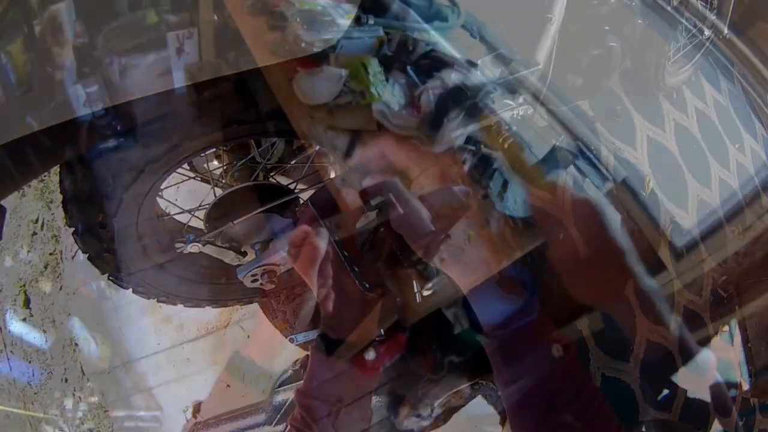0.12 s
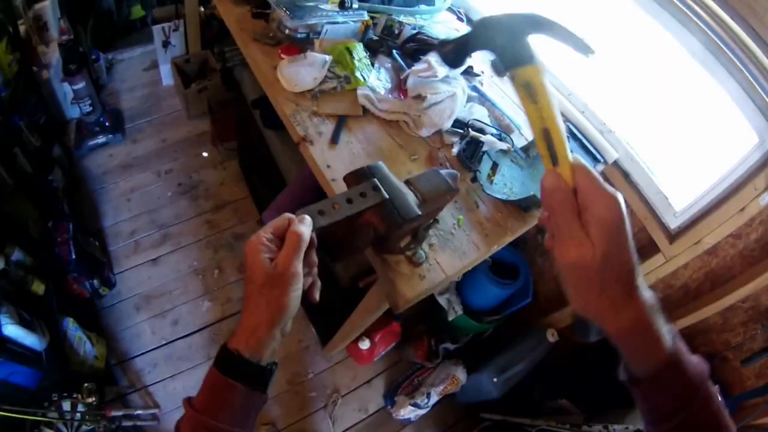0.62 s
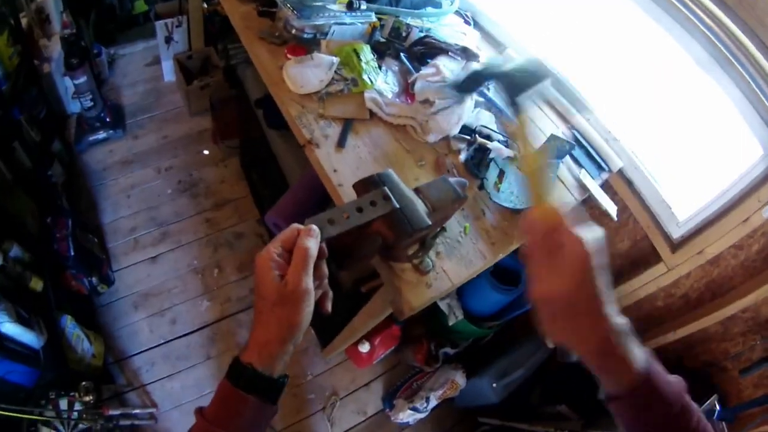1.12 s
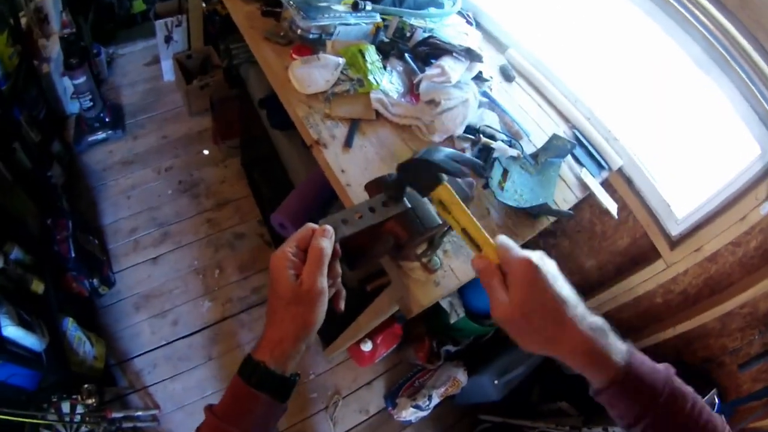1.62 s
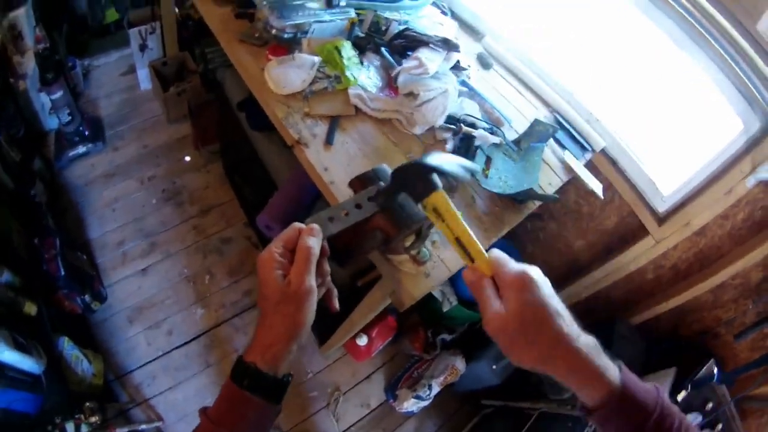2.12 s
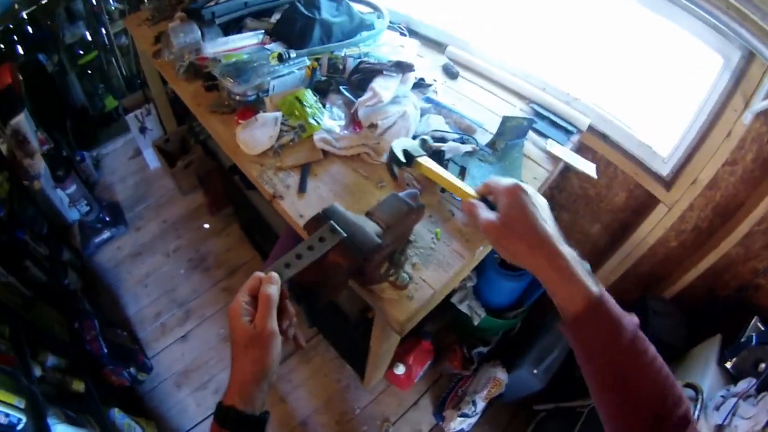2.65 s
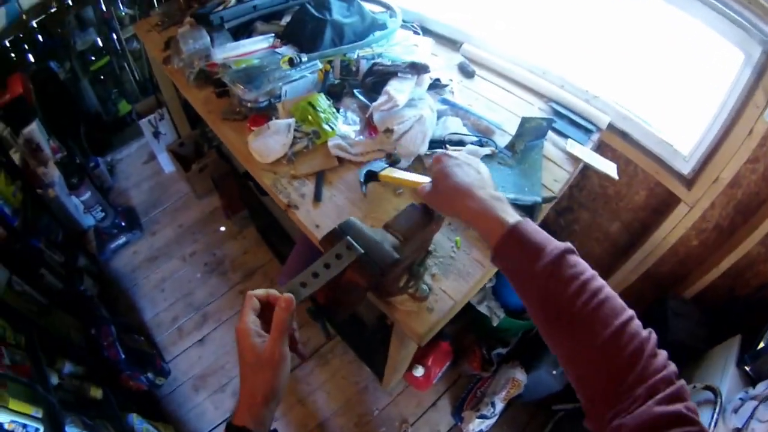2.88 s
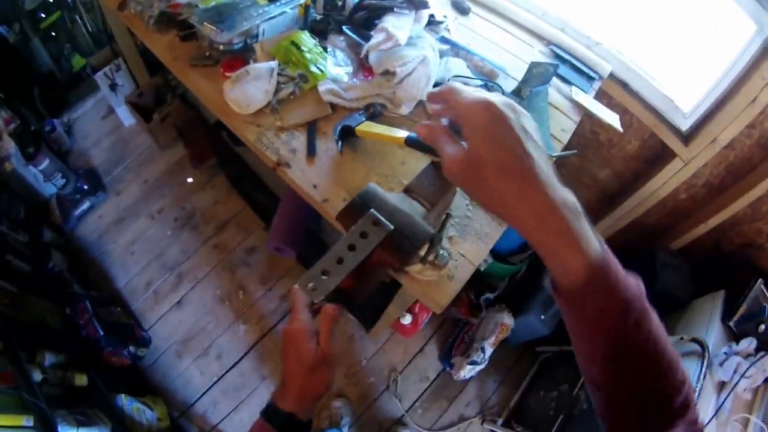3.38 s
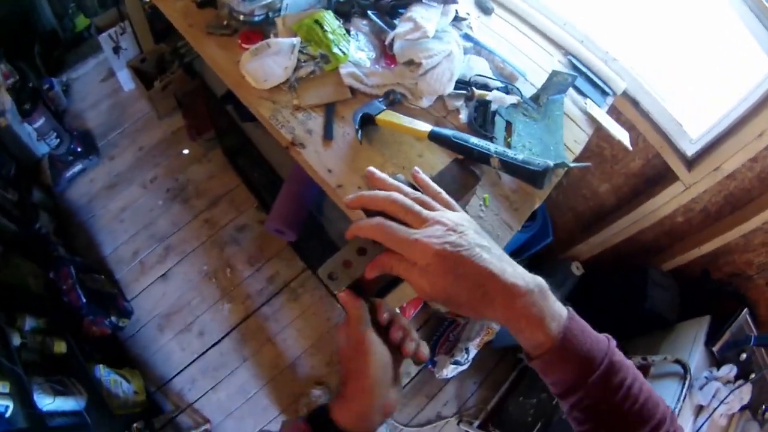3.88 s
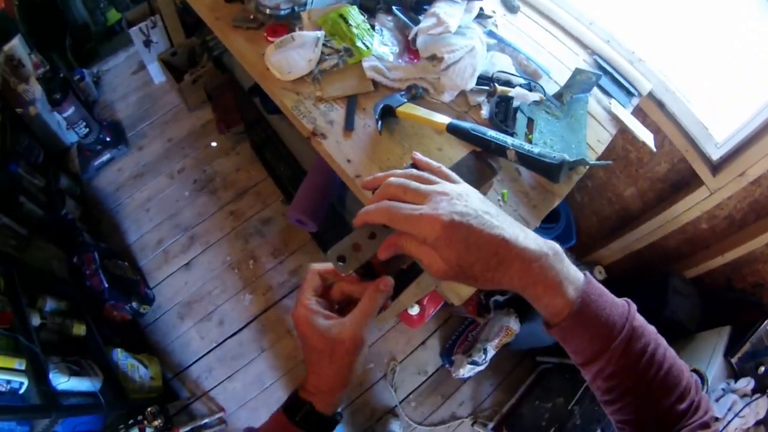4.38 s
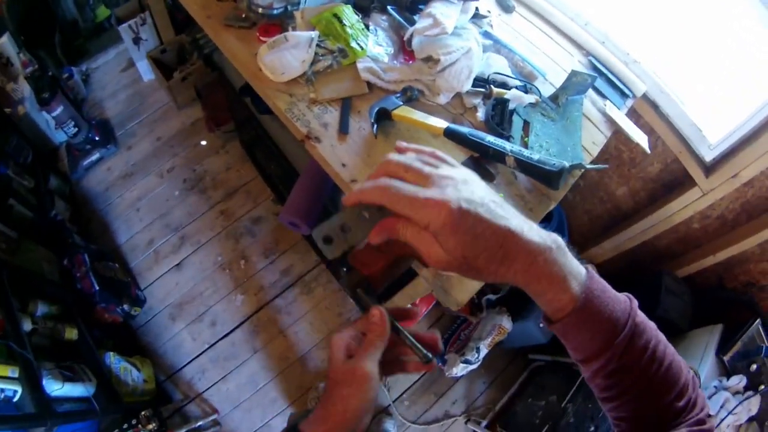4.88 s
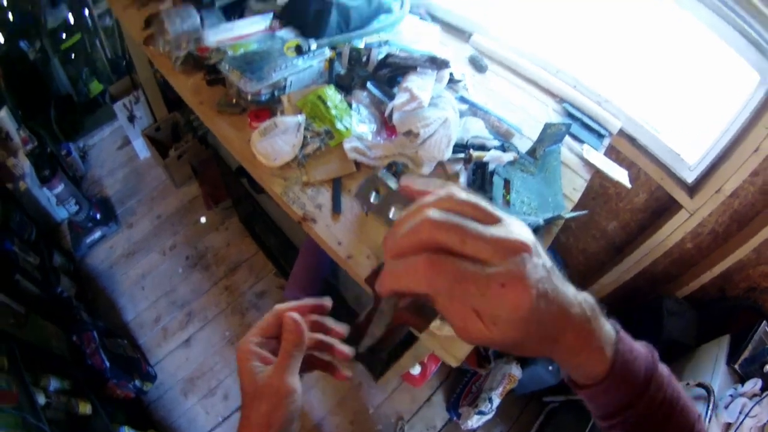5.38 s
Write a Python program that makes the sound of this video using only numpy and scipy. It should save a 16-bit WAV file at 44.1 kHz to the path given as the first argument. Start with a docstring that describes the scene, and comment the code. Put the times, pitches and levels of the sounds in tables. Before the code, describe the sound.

Six hard hammer blows clang on a clamped steel strap in a wooden workshop, then dull bench thuds and small metallic knocks and scrapes.

```python
"""A hammer blow on a steel strap opens the scene, out of a floor that is already trembling.
Place: a wooden workshop, the perforated strap held in a vice. Six blows ring strap and vice, rattle the clutter
and shudder bench and floor; then the hammer is laid down on the bench with dull thuds and a hand shifts the
strap in the jaws. Contacts are noise bursts that stir ringing modes; slides, rumble and air are coloured noise.
A small recorder overloads, pulls its gain down late and mirrors its band; an editing fade brings the sound up."""
import sys
import numpy as np
from scipy import signal
from scipy.fft import rfft, irfft, next_fast_len
from scipy.io import wavfile

SR = 44100
rng = np.random.default_rng(int(sys.argv[2]) if len(sys.argv) > 2 else 0)


def generate_wav(signal):
    """Clip the signal to [-1, 1] and save it as 16-bit WAV at the path in sys.argv[1]."""
    frames = np.transpose(np.atleast_2d(signal))
    scaled = np.clip(frames, -1, 1) * 32767
    pcm = np.round(scaled).astype(np.int16)
    wavfile.write(sys.argv[1], SR, pcm)


def gain_from_db(level_db):
    """Convert decibel levels to linear amplitude factors (20 dB per decade)."""
    decades = np.asarray(level_db, float) / 20
    return 10 ** decades


N = 243431
TIME = np.arange(N) / SR
EDGES = 20 * 2 ** np.arange(0, 8.4, 1 / 3)   # third-octave band edges, f/Hz
CENTRES = np.sqrt(EDGES[1:] * EDGES[:-1])

# Contacts, three tables alike: [t/s, level/dB before the group's gain, lows re level/dB,
# drive of the modes re level/dB, favoured f/Hz]
# hammer blows on the strap
HAMMER_BLOWS = [(0.021, 8, -3.5, -5, 1360), (0.452, 4, -5.5, -9, 1200), (0.872, 4.5, -5.5, -6, 1186),
                (1.304, 3.5, -5, -8, 1140), (1.714, 2, -4, -10, 1110), (2.157, 1, -6.5, -3.5, 1611)]
# strap knocking on the jaws, clutter settling
STRAP_KNOCKS = [(0.352, -37, 1, -19, 890), (1.962, -30.5, -3, -15, 884), (2.226, -60, -6, -20, 2340),
                (3.365, -32, -7, -5.5, 1413), (3.442, -41, -19, 5, 1390), (3.643, -25.5, -0.5, -1, 3300),
                (3.685, -45, 11, -15.5, 2460), (3.866, -47, 12, 1.5, 1410), (4.018, -49.5, 19, -3, 970),
                (4.111, -39.5, 4, 10.5, 5700), (4.164, -7.5, -12, -5.5, 1980), (4.266, -26.5, 5.5, -9, 910),
                (4.436, -41.5, 13.5, -6, 5700), (4.519, -11.5, 3, 6.5, 5870), (4.895, -34, -9.5, -30, 4860),
                (4.968, -21.5, -21, 1.5, 3840), (5.001, -19, -10.5, 0, 4100), (5.018, -33.5, 5, -15, 1400),
                (5.154, -51, 19, 1, 1350), (5.212, -21.5, -24.5, -12.5, 2270), (5.222, -32, -21, 6, 4550),
                (5.238, -33, 1, 4.5, 2310), (5.363, -10.5, 0, -2.5, 1620)]
# dull thuds of the hammer laid down on the bench top
BENCH_THUDS = [(2.952, -36, -12, -11.5, 300), (3.2415, -13.5, -5, 1, 520)]

# Modes, three tables alike: [f/Hz, level/dB, t60/s before any cap by the grip]
# strap and vice, clamped together
CLAMPED_MODES = [(315, -15, 0.11), (513, -16, 0.032), (820, -16, 0.13), (1187, 3.5, 0.022),
                 (1106, -13, 0.014), (1306, -8, 0.08), (1440, -14, 0.016), (1700, -8.5, 0.17),
                 (2205, -20, 0.12), (2598, -5.5, 0.13), (3300, -13, 0.018), (4140, -17, 0.018),
                 (5045, 1, 0.094)]
# strap free in the jaws
LOOSE_MODES = [(890, -9, .05), (1390, -6, .05), (1900, -6, .06), (2340, -4, .055), (2790, -5, .07),
               (2990, -6, .06), (3400, -5, .055), (3950, -4, .045), (4250, -3, .05), (4600, -5, .055),
               (5010, -6, .055), (5518, -7, .17)]
# wooden bench
BENCH_MODES = [(221, -2, .14), (310, -4, .12), (409, 0, .11), (490, -5, .1), (581, -1, .12), (646, -4, .12),
               (760, -8, .09), (894, -10, .1), (1583, -18, .07)]

# wash off the plank walls: [f/Hz, level re clatter/dB, t60/s]
WALL_WASH = [(300, -11, 0.51), (1170, -17.5, 0.26), (5070, -21, 0.39)]
# spectrum of the bench and floor rumble: [f/Hz, level per Hz/dB]
SHUDDER_SPECTRUM = [(13, -30), (22, 4), (38, -2), (75, -3), (103, -15.5), (187, -12), (225, -16),
                    (432, -21), (625, -38.5), (844, -32.5), (1200, -37), (1560, -72.5), (2640, -120)]
# notes at which the floor booms: [f/Hz, width/Hz, level/dB]
FLOOR_NOTES = [(29.7, 14, -12.5), (75.2, 25, -9.5)]
# contacts that shake the bench: [t/s, deep shudder level/dB, time until the deep shudder's fast fall/s]
BENCH_JOLTS = [(-0.2, -22, 0.6), (0.02, -31, 0.66), (0.452, -24.5, 0.53), (0.872, -28.5, .38),
               (1.304, -25, .36), (1.714, -25.5, 0.32), (2.157, -26.5, 0.37), (2.951, -51, 0.054),
               (3.2426, -31.5, 0.21), (3.643, -42.5, .06), (4.164, -40.5, 0.11), (4.519, -32.5, 0.083),
               (5.363, -36.5, 0.056)]
# spectrum of the room air: [f/Hz, level per Hz/dB]
AIR_SPECTRUM = [(59, -31.5), (100, -9), (240, -8.5), (440, -8.5), (1290, -13), (4890, -23.5), (5600, -44.5),
                (7280, -64.5), (12300, -120)]
# steel sliding against steel: [t/s, length/s, level/dB before colouring, favoured f/Hz]
STEEL_SLIDES = [(0.756, 0.01, -46, 2470), (1.952, 0.6, -42, 1134), (2.744, 0.12, -65, 1603),
                (3.271, 0.053, -48, 2900), (3.382, 0.054, -52.5, 2340), (3.634, 0.06, -48, 2930),
                (3.864, 0.094, -55.5, 1400), (4.002, 0.032, -54, 1376), (4.228, 0.078, -46.5, 2260),
                (4.448, 0.083, -59, 5640), (4.508, 0.073, -31, 3170), (4.899, 0.07, -54, 4800),
                (4.998, 0.073, -45, 3900), (5.137, 0.05, -47, 1390), (5.196, 0.053, -51, 4220)]
# clutter rattling after every blow: [delay/s, length/s, level re the blow's table level/dB, favoured f/Hz]
CLUTTER_RATTLES = [(0.05, 0.074, -42.5, 2620), (0.043, 0.052, -43, 14000), (0.059, .06, -54.5, 17000),
                   (.12, 0.092, -56, 1390)]
# editing fade at the start: [t/s, level/dB]
FADE_POINTS = [(0, -11), (.45, -3), (.8, 0)]


def rms_one(x):
    """Scales a signal to rms 1."""
    return x / np.sqrt(np.mean(x ** 2, axis=-1, keepdims=True) + 1e-20)


def at_hz(points, hz):
    """Reads a curve of (f, value) along a logarithmic frequency axis."""
    points = np.array(points)
    return np.interp(np.log(hz), np.log(points[:, 0]), points[:, 1])


def butter(x, order, hz, kind="low"):
    """Butterworth filter."""
    return signal.sosfilt(signal.butter(order, hz, kind, fs=SR, output="sos"), x)


def drift(rate):
    """Slow chance of rms 1: random points, rate per second, joined by lines."""
    knots = rng.standard_normal(2000)
    return rms_one(np.interp(TIME * rate, np.arange(2000), knots))


def bands(grain_db):
    """Third-octave bands of noise, flat per Hz; samples of uneven size make it grainy."""
    unevenness = np.minimum(rng.exponential(1, (2, N)), 6)
    white = rms_one(rng.standard_normal((2, N)) * gain_from_db(grain_db * unevenness))
    # neighbouring bands draw on different noise
    return np.array([butter(white[k % 2], 2, edge, "band") for k, edge in enumerate(zip(EDGES, EDGES[1:]))])


def coloured(noise, spectrum, flicker_db, rate):
    """Noise whose bands each get a level and a flicker, partly shared; rms 1."""
    shared = drift(rate)
    total = np.zeros(N)
    for band, hz in zip(noise, CENTRES):
        total += band * gain_from_db(at_hz(spectrum, hz) + flicker_db * (shared + drift(rate)))
    return rms_one(total)


def shudder(noise):
    """Low rumble of bench and floor with resonances at the floor's own notes; rms 1."""
    out = coloured(noise, SHUDDER_SPECTRUM, flicker_db=0.83, rate=17)
    for hz, width_hz, db in FLOOR_NOTES:
        b, a = signal.iirpeak(hz, hz / width_hz, fs=SR)
        boom = signal.lfilter(b, a, signal.lfilter(b, a, rng.standard_normal(N)))
        out += gain_from_db(db) * rms_one(boom)
    return rms_one(out)


def shaking(rest_db, gain_db, swell_s, share, sag_db_per_s):
    """Gain of the shudder: a resting rumble plus, for every jolt, a swell that sags and then falls fast."""
    power = np.full(N, gain_from_db(2 * rest_db))
    for s, db, lasts_s in BENCH_JOLTS:
        t = np.maximum(TIME - s, 0)
        fall_db = 163.5 * np.maximum(t - share * lasts_s, 0)   # 163.5 dB per s
        swell = 1 - np.exp(-t / swell_s)
        power += (swell * gain_from_db(db + gain_db - sag_db_per_s * t - fall_db)) ** 2
    return np.sqrt(power)


def rumble(noise):
    """The deep part of the shudder outlasts the upper part, which swells more slowly and sags faster."""
    split_hz = 110
    whole = shudder(noise)
    deep = butter(whole, 2, split_hz)
    upper = butter(whole, 2, split_hz, "high")
    deep_gain = shaking(rest_db=-50, gain_db=0, swell_s=0.013, share=1, sag_db_per_s=10)
    upper_gain = shaking(rest_db=-49.5, gain_db=5.5, swell_s=0.068, share=.7, sag_db_per_s=41)
    return deep * deep_gain - upper * upper_gain


def room_air(noise):
    """Steady background air: coloured noise with a quick flicker."""
    return gain_from_db(-53.5) * coloured(noise, AIR_SPECTRUM, flicker_db=1.2, rate=24)


def ring(x, hz, t60):
    """Damped resonance: a unit click sets a sine of height 1 ringing."""
    r, w = gain_from_db(-60 / (t60 * SR)), 2 * np.pi * hz / SR
    return signal.lfilter([0, np.sin(w)], [1, -2 * r * np.cos(w), r * r], x + 1e-18)


def strike(events, modes, noise, t60, gain_db, body_hz, high_db, rise_s, crack_s, crack_db,
           db_per_octave, chatter_share, longest_s):
    """Each contact cracks, clatters (treble dies faster), washes off the walls and chatters on the modes."""
    out, drive, t = np.zeros(N), np.zeros((len(modes), N)), TIME[:SR // 2]
    walls, mode_hz = np.array(WALL_WASH), np.array(modes)[:, :1]
    wash_t60 = at_hz(walls[:, ::2], CENTRES)[:, None]
    wash = gain_from_db(at_hz(walls, CENTRES)[:, None] - 60 * t / wash_t60)
    wash *= np.minimum(t / 0.036, 1)   # the walls answer gradually
    clatter_t60 = t60 * (CENTRES / 2000) ** -.2
    clatter = gain_from_db(-60 * t / clatter_t60[:, None])
    crack = gain_from_db(crack_db - 60 * t / crack_s)
    for s, db, low_db, ring_db, favoured_hz in events:
        i = round(s * SR)
        n = min(len(t), N - i)
        rise = gain_from_db(db + gain_db) * np.minimum(t[:n] / rise_s, 1)
        spectrum = [(body_hz / 12, low_db - 28.5), (body_hz / 5, low_db - 5.5), (body_hz / 2, low_db - 4.0),
                    (body_hz, low_db), (2500, (low_db + high_db) / 2 - 5.0), (5500, high_db)]
        colour = at_hz(spectrum, CENTRES)
        # extra level around the pitch that the contact point favours
        colour += 4 * np.exp(-(np.log2(CENTRES / favoured_hz) / 0.45) ** 2)
        shape = clatter[:, :n] + crack[:n] + wash[:, :n]
        out[i:i + n] += rise * (gain_from_db(colour) @ (shape * noise[:, i:i + n]))
        chatter = gain_from_db(-60 * t[:n] / (chatter_share * t60))
        share_db = -db_per_octave * np.abs(np.log2(mode_hz / favoured_hz))
        share_db += rng.normal(0, 2.5, share_db.shape)   # no two contacts stir the modes alike
        drive[:, i:i + n] += rise * gain_from_db(ring_db + share_db) * chatter / np.sqrt(np.sum(chatter ** 2))
    drive *= rng.standard_normal(drive.shape)
    for x, (hz, db, mode_t60) in zip(drive, modes):
        out += ring(x, hz, min(mode_t60, longest_s)) * gain_from_db(db)   # the grip limits the ringing
    return out


def hammer_blows(noise):
    """Hammer on the clamped strap: a very fast rise, a strong crack, modes damped by the vice."""
    return strike(HAMMER_BLOWS, CLAMPED_MODES, noise, t60=0.16, gain_db=10.0, body_hz=1071.3, high_db=-10,
                  rise_s=0.00031, crack_s=0.015, crack_db=14.0, db_per_octave=4.0, chatter_share=0.51,
                  longest_s=.045)


def rubbing(noise):
    """Grit under each slide or rattle hisses near its favoured pitch and stirs the strap's modes there."""
    out, drive = np.zeros(N), np.zeros((len(LOOSE_MODES), N))
    mode_hz = np.array(LOOSE_MODES)[:, :1]
    rattles = [(s + delay, length, db + re_db, hz) for s, db, *_ in HAMMER_BLOWS
               for delay, length, re_db, hz in CLUTTER_RATTLES]
    for s, length, db, favoured_hz in STEEL_SLIDES + rattles:
        part = slice(round(s * SR), round((s + length) * SR))
        stroke = gain_from_db(db) * np.sqrt(signal.windows.tukey(part.stop - part.start, .8))
        colour = gain_from_db(8 - 9 * np.abs(np.log2(CENTRES / favoured_hz)))
        out[part] += stroke * (colour @ noise[:, part])
        drive[:, part] += stroke * gain_from_db(-30 * np.abs(np.log2(mode_hz / favoured_hz)))
    snags = rms_one(rng.standard_normal(N) * gain_from_db(5.5 * np.minimum(rng.exponential(1, N), 6)))
    ringing = sum(gain_from_db(db) * ring(x * snags, hz, t60) for x, (hz, db, t60) in zip(drive, LOOSE_MODES))
    return out + gain_from_db(-15) * ringing


def strap_knocks(noise):
    """Loose strap on the jaws and settling clutter: a longer crack, modes that ring on more freely."""
    return strike(STRAP_KNOCKS, LOOSE_MODES, noise, t60=0.14, gain_db=-3.5, body_hz=1139, high_db=-6,
                  rise_s=0.001, crack_s=0.15, crack_db=-3.5, db_per_octave=16, chatter_share=0.32,
                  longest_s=.17)


def bench_thuds(noise):
    """Hammer laid down on the wooden bench top: little treble, hardly any crack, low wooden modes."""
    return strike(BENCH_THUDS, BENCH_MODES, noise, t60=0.32, gain_db=8.0, body_hz=571, high_db=-17.0,
                  rise_s=0.002, crack_s=0.022, crack_db=-28.5, db_per_octave=0, chatter_share=.17,
                  longest_s=.17)


def scene():
    """All sources summed, the same in both channels."""
    smooth, gritty = bands(grain_db=0), bands(grain_db=-2.0)
    hits = hammer_blows(gritty) + strap_knocks(gritty) + bench_thuds(gritty)
    # bands taken in reverse time keep layers from moving together
    mid = hits + rumble(smooth) + rubbing(gritty[:, ::-1]) + room_air(smooth[:, ::-1])
    return np.array([mid, mid])


def late_gain(x, threshold_db, share, lag_s, attack_s, release_db_per_s):
    """Gain control: reacts a few ms after a loud sound and lets go at a steady rate."""
    over_db = np.maximum(20 * np.log10(np.abs(x).max(axis=0) + 1e-9) - threshold_db, 0)
    release_db = release_db_per_s * TIME
    held_db = np.maximum.accumulate(over_db + release_db) - release_db
    r = np.exp(-1 / (attack_s * SR))
    cut_db = signal.lfilter([1 - r], [1, -r], np.interp(TIME - lag_s, TIME, held_db))
    return x * gain_from_db(-share * cut_db)


def overload(x):
    """Soft saturation: nearly straight at low level, bending to a ceiling of 0.76."""
    return .76 * x / (1 + np.abs(x) ** 6) ** (1 / 6)


def sample_and_hold(x):
    """Slow converter holding samples as steps: the band mirrors about the clock rate, weakest right at it."""
    clock_hz = 12000
    x = signal.sosfilt(signal.cheby2(8, 40, 6660, fs=SR, output="sos"), x)
    x = x * (1 + 2 * np.cos(2 * np.pi * clock_hz * TIME))   # adds the mirrored bands
    size = next_fast_len(N)
    hz = np.arange(size // 2 + 1) * SR / size
    steps = irfft(rfft(x, size) * np.sinc(hz / clock_hz), size)[:, :N]
    return signal.sosfilt(signal.cheby2(20, 40, 15750, fs=SR, output="sos"), steps)


def echoes(x, t60, dull_hz):
    """Dense close reflections: noise that dies away."""
    t = TIME[:SR // 2]
    tail = rng.standard_normal(len(t)) * gain_from_db(-60 * t / t60) * (t > .0004)
    tail = butter(tail, 1, dull_hz)
    return signal.fftconvolve(x, tail / np.sqrt(np.sum(tail ** 2)))[:N]


def two_channels(x):
    """Left and right differ little: least in the bass, most in the treble; the right is a shade louder."""
    blur = echoes(x[0], t60=.02, dull_hz=15000)
    difference = gain_from_db(-36.0) * blur + gain_from_db(-17.0) * butter(blur, 2, 9000, "high")
    side = butter(difference - .028 * x[0], 1, 150, "high")
    return x + side * [[1], [-1]]


def editing_fade(x):
    """A fade laid over the finished sound brings it up to full level at the start."""
    return x * gain_from_db(np.interp(TIME, *np.transpose(FADE_POINTS)))


def low_pass(x):
    """Removes everything above the highest recorded frequency."""
    return signal.sosfilt(signal.butter(12, 16130, fs=SR, output="sos"), x)


def record(dry):
    """Small recorder (late gain control, overload, slow converter, two channels), then the editing fade."""
    x = late_gain(dry, threshold_db=-2, share=0.68, lag_s=0.0058, attack_s=0.0009, release_db_per_s=171)
    x = sample_and_hold(overload(x))
    mix = editing_fade(two_channels(x))
    return low_pass(mix)


dry = scene()
out = record(dry)
generate_wav(out)
```